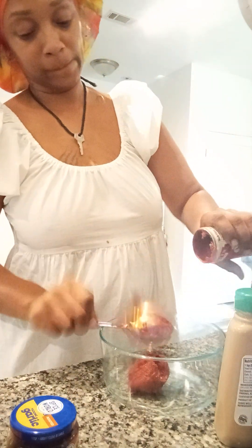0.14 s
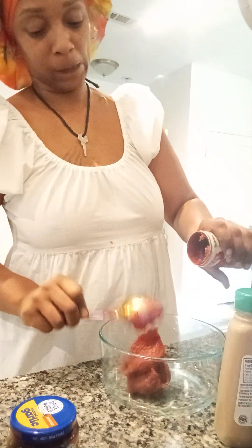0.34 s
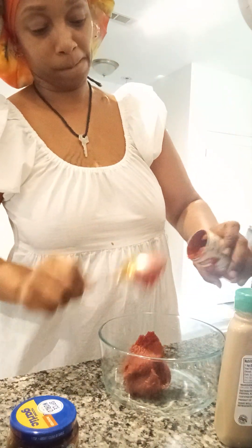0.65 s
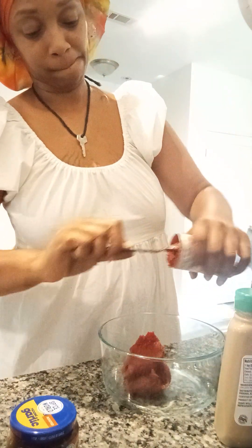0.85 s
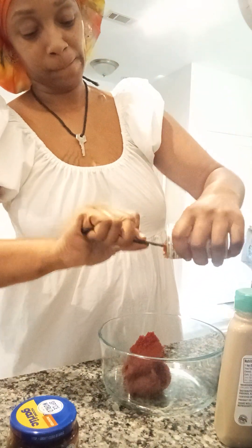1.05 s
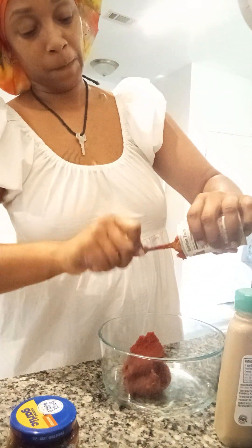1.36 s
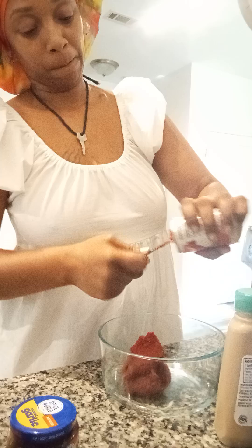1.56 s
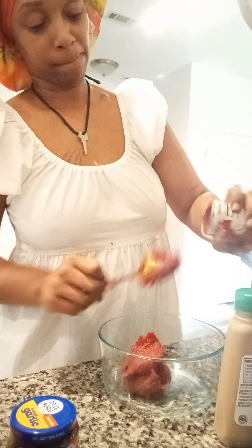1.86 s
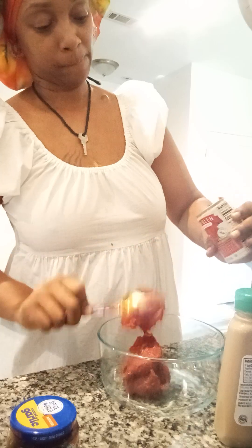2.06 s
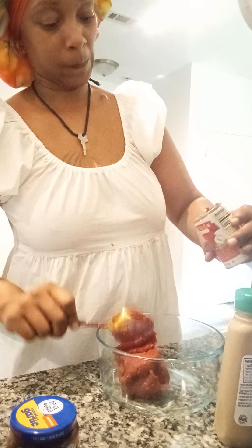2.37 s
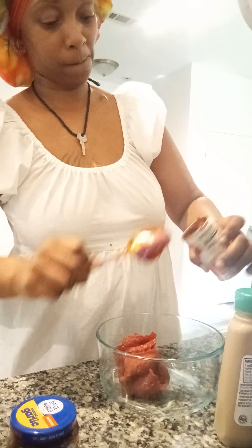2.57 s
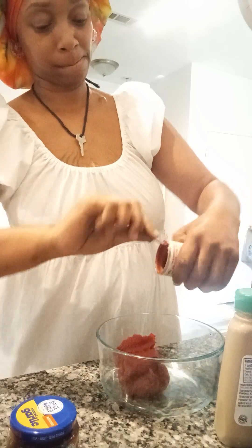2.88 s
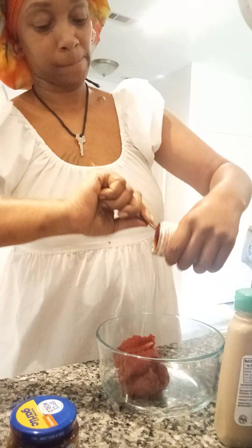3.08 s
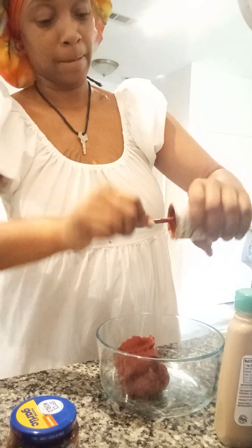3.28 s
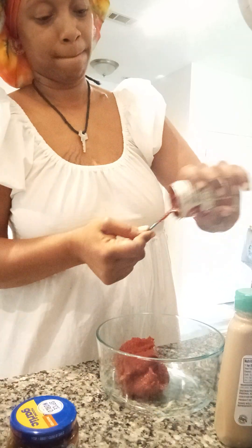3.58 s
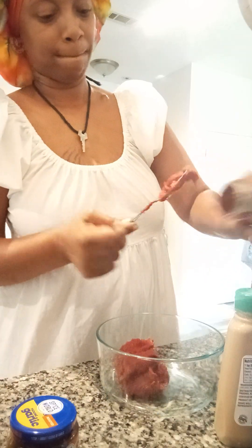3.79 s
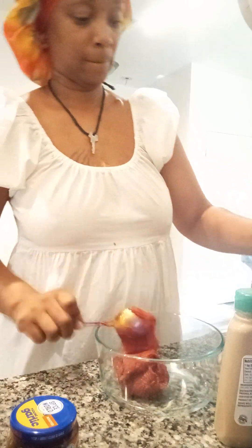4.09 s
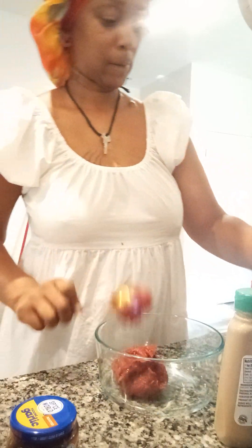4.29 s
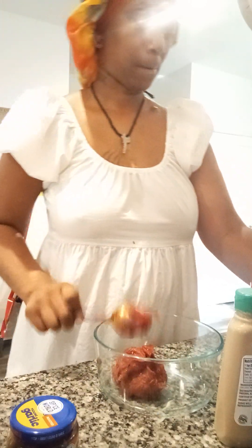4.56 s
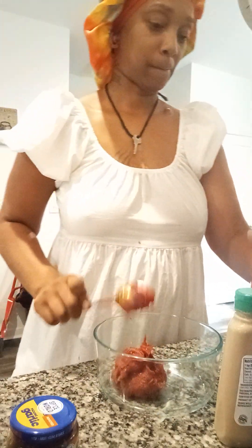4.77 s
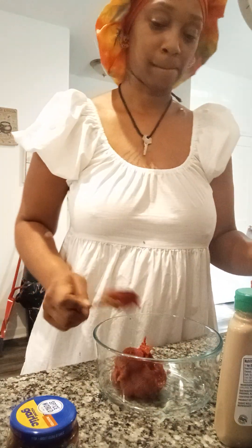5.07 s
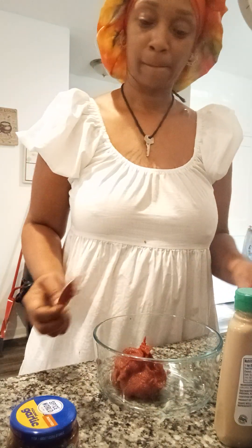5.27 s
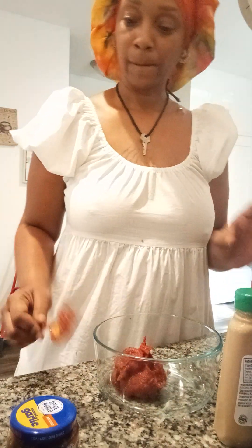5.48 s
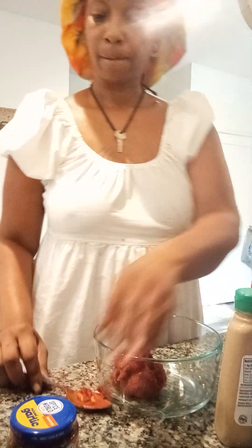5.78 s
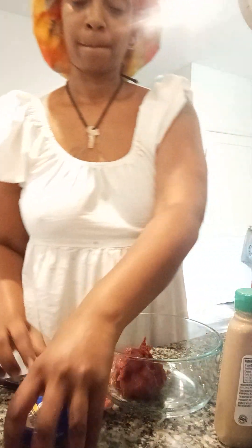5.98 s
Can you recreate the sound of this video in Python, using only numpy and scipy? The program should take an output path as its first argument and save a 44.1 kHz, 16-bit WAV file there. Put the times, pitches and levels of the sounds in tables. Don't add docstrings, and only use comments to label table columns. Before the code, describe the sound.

Sharp steel-on-glass knocks ring and rattle a bowl on a kitchen counter, separated by hollow tin scraping, ending with a metal lid clattering down.

```python
import sys
import numpy as np
from scipy import signal
from scipy.fft import rfft, irfft, next_fast_len
from scipy.io import wavfile
from scipy.ndimage import uniform_filter1d, map_coordinates

SR = 44100
rng = np.random.default_rng(int(sys.argv[2]) if len(sys.argv) > 2 else 0)


def log_audio(samples):
    frames = np.atleast_2d(samples).T
    limited = np.clip(frames, -1, 1)
    pcm = np.round(limited * 32767).astype(np.int16)
    wavfile.write(sys.argv[1], SR, pcm)


def ratio(d):
    e = np.asarray(d, float) / 20
    return 10 ** e


N = 270774
TIME = np.arange(N) / SR

# t/s, crack level/dB, counter thump/dB, brightness/dB, upper modes/dB
SPOON_KNOCKS = [(0.233, -2, -32, 0.5, -30), (0.37, -5, -33.5, 2.5, -37.5), (0.488, -2, -36, -15, -41),
                (0.614, -2, -44, -4, -42), (2.05, -4.5, -33.5, 2, -32.5), (2.189, -4.5, -35, 6, -42.5),
                (2.305, 0, -37.5, -2.5, -42.5), (2.413, -4, -37.5, 9.5, -43.5),
                (4.166, -2.5, -31.5, 5, -29.5), (4.324, -4.5, -34, 7.5, -30.5),
                (4.463, -3.5, -32.5, 2.5, -30), (4.617, -4, -36, 9.5, -32.5), (4.778, -3, -34.5, -2, -29.5),
                (4.92, -2.5, -35.5, 2, -31), (5.046, -3, -37.5, -6.5, -40)]
# t/s, level/dB, bowl-floor tone/dB, counter/dB
FOOT_LANDINGS = [(.288, -5, -11, -3.5), (.296, -4.5, -9.5, -3.5), (0.336, -11.5, -13, -1.5),
                 (.534, -6, -11.5, -5.5), (.57, -11, -12.5, -4.5), (.603, -20, -16, -3.5),
                 (.662, -4.5, -12.5, -8.5), (.694, -11, -15, -5), (.731, -13.5, -20, -4),
                 (.753, -23, -26, -3), (.778, -27.5, -23.5, -1), (2.094, -7, -11, -5.5),
                 (2.129, -9, -13.5, -8.5), (2.16, -18, -17, -4), (2.23, -7, -21, -8),
                 (2.26, -15.5, -21.5, -7), (2.285, -23.5, -20, -4), (2.357, -2, -14.5, -10.5),
                 (2.392, -11.5, -13.5, -6.5), (2.459, -25.5, -17, -6.5), (4.217, -3.5, -15.5, -9.5),
                 (4.253, -5, -20, -8.5), (4.284, -10, -13, -8), (4.311, -17.5, -13, -6),
                 (4.373, -19.5, -16, -3), (4.505, -7, -12, -6), (4.535, -11, -18, -5.5),
                 (4.563, -14.5, -23, -10), (4.591, -20.5, -17.5, -3), (4.658, -9, -17, -4.5),
                 (4.687, -16.5, -18, -0.5), (4.713, -16, -15.5, -2.5), (4.738, -21, -20, -4.5),
                 (4.825, -3.5, -13, -8.5), (4.857, -10.5, -15.5, -5.5), (4.889, -10, -18, -6),
                 (4.946, -16, -15, -5.5), (5.081, -10.5, -14, -8), (5.104, -14, -14.5, -6),
                 (5.133, -20.5, -14, -1)]
# f/Hz, width/Hz, level/dB
FLOOR_MODES = [(4010, 120, 0)]
# f/Hz, width/Hz, level/dB
SLAB_MODES = [(391, 50, -9), (465, 41, -12.5), (682, 53.6, -1.5), (755, 66, -7), (838, 70, -0.5),
              (1000, 250, -8), (1175, 90, -7), (1318, 70, -4.5), (1415, 90, -3.5)]
# f/Hz, width/Hz, level/dB
CABINET_MODES = [(93.6, 16, -1.5), (123, 22, 0.5), (169.5, 22, 1.5), (266, 86, -8.5)]


def unit(x):
    return x / np.sqrt(np.mean(x ** 2) + 1e-20)


def along(points, hz):
    f, v = np.transpose(points)
    return np.interp(np.log(hz + 1), np.log(f + 1), v)


def filtered(x, response):
    m = next_fast_len(x.shape[-1] + SR)
    return irfft(rfft(x, m) * response(np.fft.rfftfreq(m, 1 / SR)), m)[..., :x.shape[-1]]


def resonance(f, centre_hz, width_hz):
    damping = 1j * f * width_hz
    return damping / (centre_hz * centre_hz - f * f + damping)


def body(x, peaks):
    def response(f):
        return sum((-1) ** k * ratio(db) * resonance(f, hz, width_hz)
                   for k, (hz, width_hz, db) in enumerate(peaks))
    return filtered(x, response)


def coloured(spectrum):
    return unit(filtered(rng.standard_normal((2, N)), lambda hz: ratio(along(spectrum, hz))))


def partly(pair, share):
    return np.sqrt(1 - share) * pair[0] + np.sqrt(share) * pair[1] * np.array([[1], [-1]])


def decays(times, db, t60, rise=0.0016):
    out = np.zeros(N)
    for s, level_db, t in np.broadcast(times, db, t60):
        near = slice(int(s * SR), int((s + 2 * abs(t)) * SR))
        age = np.maximum(TIME[near] - s, 0)
        out[near] += ratio(level_db - 60 * age / t) * (1 - np.exp(-age / rise))
    return out


def peaked(s, db, rise_db_per_s, fall_db_per_s):
    s, db, rise, fall = [np.reshape(v, (-1, 1)) for v in (s, db, rise_db_per_s, fall_db_per_s)]
    age = TIME - s
    return ratio(db + np.where(age < 0, rise, -fall) * age)


def wobble(rate):
    return map_coordinates(rng.standard_normal(int(N / SR * rate) + 4), [TIME * rate])


def knocks():
    # f/Hz, density/dB per Hz
    crack_spectrum = [(150, -28), (250, -5), (2070, 3.5), (3980, -3), (5660, -6.5), (6400, -10.5),
                      (7370, -14), (11900, -14.5), (14900, -22.5), (16900, -43)]
    # bowl floor/dB, slab/dB
    shakes = [(1, 6), (2.5, 4), (0.5, 2.5), (3.5, 4.5), (5, 7.5), (-2, -1.5), (1.5, 7.5), (7, -3),
              (0.5, -0.5), (3.5, -2.5), (4.5, -0.5), (6, 2), (5, 6), (3, 1), (3.5, 5)]
    s, db, thump_db, bright_db, _ = np.transpose(SPOON_KNOCKS)
    floor_db, slab_db = np.transpose(shakes)
    noise = partly(coloured(crack_spectrum), share=0.34)
    treble = filtered(noise, lambda hz: hz ** 2 / (hz ** 2 + 6000 ** 2))
    push = np.zeros(N)
    push[np.round(s * SR).astype(int)] = ratio(thump_db + 58.0)
    out = noise * (decays(s, db - 7.0, 0.027) + decays(s, db - 24.5, 0.12))
    out += treble * decays(s, db + bright_db + 1.5, 0.0039)
    out += body(push, CABINET_MODES)
    out += body(noise * decays(s, db + slab_db, 0.0094), SLAB_MODES)
    out += body(noise * decays(s, db + floor_db, 0.046), FLOOR_MODES)
    return out


def rim():
    rim_hz = [2612, 3968, 5612, 7520]
    # t60/s, partner offset/Hz, left-right/dB, left phase lead/rad
    rim_modes = [(0.56, 7.8, -2.5, -0.9), (0.58, 20, 7.5, 1.25), (0.29, 6.5, 1, -1.1), (0.16, 16, 0, -1.95)]
    grips_db = [0.2, 0.57, .7, 1.2]
    partners_db = [-13.5, -9.5, -14, -12.5]
    rings = [(-44, -49, -35.5, -47), (-28, -51.5, -30.5, -46.5), (-42.5, -40.5, -29.5, -53),
             (-38, -57.5, -27.5, -47), (-49, -33.5, -40.5, -45), (-31, -64, -33.5, -54),
             (-43, -71.5, -29.5, -52.5), (-48, -66, -51.5, -22.5), (-25, -50, -26.5, -42),
             (-44, -36.5, -25.5, -30.5), (-35, -34.5, -26, -25.5), (-39, -35.5, -23, -20),
             (-31, -52.5, -26.5, -24.5), (-32, -26.5, -44, -27.5), (-30, -32, -24.5, -26)]
    uppers_hz = [4420, 5260, 6035, 11100, 11700, 13500, 6944, 7255, 8306, 8790, 9485, 9733, 10150, 10680,
                 11390, 12110, 12350, 12870, 13210, 14100, 14420, 14740, 15560]
    uppers_db = [-19, -21, -16, -30, -36, -33, -17, -18, -8, -10, -9.5, -11, -15, -8.5, -13, -12, -17, -16,
                 -14, -22, -6.5, -7.5, -13]
    flare_db, flare_share = 3, 0.18
    shimmer_rad = 0.7

    s, *_, upper_db = np.transpose(SPOON_KNOCKS)
    last = np.maximum(np.searchsorted(s, TIME) - 1, 0)
    age = np.maximum(TIME - s[last], 0)
    feet = np.array(FOOT_LANDINGS)
    landed = np.cumsum(np.bincount(np.round(feet[:, 0] * SR).astype(int), ratio(0.6 * feet[:, 1]), N))
    landed = uniform_filter1d(landed, size=400)
    held = np.maximum(landed - landed[np.round(s[last] * SR).astype(int)], 0)

    modes = []
    for hz, mode, grip, twin_db, db in zip(rim_hz, rim_modes, grips_db, partners_db, np.transpose(rings)):
        modes.append((hz, *mode, grip, twin_db, db + 4.5, 0))
    for hz, db in zip(uppers_hz, uppers_db):
        scatter_db = np.clip(rng.normal(0, 4.5, len(s)), -8, 5)
        modes.append((hz, 3500 / hz, 23, 0.3, 1.6, 1.5, -6.5, db + 4.0 + upper_db + scatter_db, shimmer_rad))

    wander = wobble(70)
    side, out = np.array([[0.5], [-0.5]]), np.zeros((2, N))
    for hz, t60, split_hz, pan_db, lead, grip, twin_db, db, shimmer in modes:
        luck = rng.standard_normal((len(s), 3))[last].T
        phase = 2 * np.pi * hz * age + shimmer * np.roll(wander, 7 * hz)
        phase = phase + side * (lead + np.tanh(luck[0]) / 2)
        flare = 1 + ratio(flare_db - 60 * age / (flare_share * t60))
        beat = np.sin(phase + 2 * np.pi * split_hz * age + 3 * luck[1])
        beat *= ratio(twin_db + 0.45 * grip * held)
        level_db = db[last] - grip * held - 60 * age / t60 + side * (pan_db + 1.9 * luck[2])
        out += ratio(level_db) * (flare * np.sin(phase) + beat)
    return out * (1 - np.exp(-age / 0.00024))


def hum():
    # start t/s, swell time/s, peak level/dB
    hum_swells = [(0.234, 0.15, -29), (.489, 0.063, -37.5), (.575, 0.046, -30.5), (.63, 0.045, -26),
                  (2.052, 0.11, -35), (2.188, 0.056, -34.5), (2.26, 0.039, -34), (2.395, 0.03, -36),
                  (4.166, 0.022, -28.5), (4.2, 0.045, -23.5), (4.31, 0.046, -24), (4.462, 0.05, -24.5),
                  (4.617, 0.078, -28), (4.765, 0.012, -31.5), (4.9, 0.0773, -26), (5.06, 0.049, -29.5),
                  (5.53, 0.0072, -75), (5.815, 0.0039, -68)]
    hum_hz, swell_db = 1527, 10
    t60_s, late_db, late_t60_s = 0.42, -11, 0.94
    s, swell_s, db = np.transpose(hum_swells)
    last = np.searchsorted(s, TIME) - 1
    swells = peaked(s + swell_s, db, swell_db / swell_s, 60 / t60_s)
    swells += peaked(s + swell_s, db + late_db, swell_db / swell_s, 60 / late_t60_s)
    size = swells[last, np.arange(N)] * (last >= 0)
    size = uniform_filter1d(size, size=300) * ratio(5.5 + 0.43 * wobble(45))
    lead = np.array([[0.5], [-0.5]]) * (-1.7 + 0.089 * wobble(9))
    return size * np.sin(2 * np.pi * hum_hz * TIME + 0.78 * wobble(30) + lead)


def rolls(s, db):
    u = np.arange(SR // 10) / SR / 0.012
    spikes = np.bincount(np.round((s - 0.0035) * SR).astype(int), ratio(db), N)
    return signal.fftconvolve(spikes, (2.72 * u) ** 1.416 * np.exp(-2.5 * u ** 1.45))[:N]


def chatter(share):
    grains = ratio(5.4 * rng.standard_normal(N))
    return partly(rng.standard_normal((2, N)) * grains, share)


def rocking():
    # f/Hz, width/Hz, level/dB
    foot_modes = [(1825, 78, -2), (2202, 68, -3.5), (2760, 340, -5.5), (3450, 300, -11), (4300, 230, -10),
                  (5470, 110, -12), (6032, 110, -2), (6990, 130, -15), (8410, 140, -9), (8250, 79, -14.5),
                  (9710, 100, -12.5), (10150, 63, -20), (10500, 81, -15.5), (11200, 75, -19.5)]
    s, db, tone_db, stone_db = np.transpose(FOOT_LANDINGS)
    slab = chatter(0.2)
    layers = [(chatter(0.44), foot_modes, db - 8.5),
              (chatter(0.4), FLOOR_MODES, db + tone_db + 0.5),
              (slab, SLAB_MODES, db + stone_db),
              (slab[[0, 0]], CABINET_MODES, db + stone_db - 18.0)]
    out = np.zeros((2, N))
    for x, peaks, level_db in layers:
        blunt = filtered(x * rolls(s, level_db), lambda hz: 1 / (1 + 1j * hz / 9000) ** 2)
        out += body(blunt, peaks) / np.std(body(x, peaks))
    return out


def between_modes(x):
    # f/Hz, width/Hz, depth/0-1
    valleys = [(4800, 340, 0.4), (6450, 280, 0.7), (7340, 120, .4), (7800, 200, .3), (9000, 500, .85),
               (10300, 350, .85), (11000, 290, .7), (11800, 400, .85), (12600, 300, .85), (13700, 700, .85),
               (15100, 500, .8)]

    def response(f):
        notches = [1 - np.clip(depth, 0, 1) * resonance(f, hz, width_hz) for hz, width_hz, depth in valleys]
        return np.prod(notches, axis=0)
    return filtered(x, response)


def ticks():
    # t/s, peak level/dB, tone f/Hz, tone level/dB
    tin_ticks = [(0.8753, -23, 2630, -22), (0.9565, -28.5, 2260, -8), (1.0842, -31, 1990, -7.5),
                 (1.1056, -38, 2050, -14), (1.8225, -29.5, 4200, -20), (2.8302, -26, 2490, -10.5),
                 (2.927, -32, 2520, -5), (2.9526, -12.5, 2313, -12), (3.376, -44, 3030, -14),
                 (3.435, -47, 5600, -7.5), (3.476, -26, 4840, -6), (3.509, -35, 2570, -9),
                 (3.662, -31, 2130, -11.5), (3.698, -34, 2900, -1.5), (3.72, -36, 6200, -12.5),
                 (3.7288, -30.5, 1910, -9.5), (3.745, -29, 3105, -2), (3.746, -42, 2630, 2),
                 (3.764, -27.5, 7200, -8), (3.7793, -33.5, 2705, -1.5), (3.8856, -51.5, 2850, -11.5),
                 (5.4141, -41.5, 2580, -14), (5.817, -42.5, 6700, -8)]
    tones_t60 = [.04, .04, .04, .04, .05, .04, .04, .035, .03, .04, .03, .12, .04, .06, .03, .04, .05, .12,
                 .03, .06, .03, .03, .03]
    # f/Hz, density/dB per Hz
    tick_spectrum = [(240, -57), (400, -33.5), (1150, -5), (1810, -9.5), (2320, -5), (4000, -10),
                     (5220, -4.5), (12300, -24), (16500, -33)]
    s, db, _, _ = np.transpose(tin_ticks)
    out = partly(coloured(tick_spectrum), share=0.41) * decays(s, db - 7.5, 0.03, rise=0.00038)
    for (start_s, peak_db, hz, tone_db), t60 in zip(tin_ticks, tones_t60):
        lead = np.array([[0], [rng.normal(0, 1.8)]])
        tone = np.sin(2 * np.pi * hz * (TIME - start_s) + lead)
        out += decays(start_s, peak_db + tone_db, t60) * tone
    return out


def scraping():
    # hardest moment t/s, level/dB, 20 dB swell/s, 20 dB fade/s
    strokes = [(.895, -44, 0.18, 0.06), (1.5, -66, 0.7, 6), (1.257, -55, 0.3, 0.17),
               (1.786, -40, 0.0244, -0.03), (1.811, -37, 0.03, -0.0261), (2.89, -52, 0.22, 0.37),
               (3.0, -73, -0.1, -1), (3.505, -49, 0.11, 0.12), (3.704, -42, 0.12, -0.0349),
               (3.761, -33.5, 0.0265, 0.0167), (3.784, -39, -0.03, 0.0248)]
    strokes_low_db = [-3, -6, -2, -0.5, -1.5, -2.5, -5.5, -3.5, 4, -6.5, -14]
    # f/Hz, width/Hz, level/dB
    wall_modes = [(328, 110, -2.5), (1212, 210, 3.5), (2170, 47, 3), (2690, 400, -2), (3240, 200, 1),
                  (3810, 620, -3), (5200, 580, 1), (5900, 1400, -2.5), (7540, 1300, -4.5),
                  (10200, 6900, -17.5)]
    grains_db = 3.4 * unit(uniform_filter1d(rng.standard_normal(N), size=50))
    grit = partly(rng.standard_normal((2, N)) * ratio(grains_db), share=0.53)
    s, db, swell_s, fade_s = np.transpose(strokes)
    low, high = body(grit, wall_modes[:2]), body(grit, wall_modes[2:])
    out = np.zeros((2, N))
    for level_db, wall in ((db + strokes_low_db, low), (db, high)):
        size = peaked(s, level_db, 20 / np.abs(swell_s), 20 / np.abs(fade_s)).sum(axis=0)
        out += size * wall / np.std(low + high)
    return out


def pop():
    start_s, level_db, t60_s = 2.9275, -31.5, 0.061
    from_hz, to_hz, fall_s, rough_rad = 1720, 922, 0.0018, 1.1
    age = np.maximum(TIME - start_s, 0)
    turns = to_hz * age + (from_hz - to_hz) * fall_s * (1 - np.exp(-age / fall_s))
    tone = np.sin(2 * np.pi * turns + rough_rad * wobble(1300))
    return decays(start_s, level_db, t60_s, rise=0.00025) * tone


def brush():
    # f/Hz, level/dB, t60/s
    brush_tones = [(1560, -48.5, 0.045), (2580, -63, 0.26), (3160, -42, 0.015), (3900, -43.5, 0.018),
                   (4800, -46, .016)]
    return sum(decays(5.818, db, t60) * np.sin(2 * np.pi * hz * TIME) for hz, db, t60 in brush_tones)


def booms():
    # t/s, peak level/dB, pitch f/Hz
    hollow = [(0.882, -48, 955), (1.185, -57, 776), (1.244, -41.5, 748), (1.261, -46, 717),
              (1.294, -46.5, 727), (1.368, -56.5, 740), (1.455, -58.5, 817), (1.499, -59, 783),
              (1.658, -60, 893), (1.764, -37.5, 765), (1.777, -34, 765), (1.786, -33.5, 770),
              (1.796, -39.5, 768), (1.872, -54, 720), (2.953, -42, 937), (2.99, -50, 910), (3.03, -51, 907),
              (3.07, -54, 917), (3.11, -55, 913), (3.16, -60.5, 920), (3.629, -48, 783), (3.661, -33, 792),
              (3.681, -32, 702), (3.698, -31, 709), (3.705, -31, 730), (3.72, -35, 731), (3.734, -33, 736),
              (3.741, -32, 719.5), (3.803, -49, 700), (3.83, -53.5, 730), (3.895, -52.5, 719)]
    jerks = wobble(170)
    out = np.zeros((2, N))
    for s, db, hz in hollow:
        tone = np.sin(2 * np.pi * hz * (TIME - s) + 0.5 * jerks + np.array([[-0.3], [0.3]]))
        out += decays(s, db + 1.5, 0.088, rise=0.0045) * ratio(1.2 * wobble(60)) * tone
    return out


def lid():
    # t/s, peak level/dB, knock/dB, crack/dB
    lid_drops = [
        (5.9582, 0, -25.5, -11),
        (5.9765, -3.5, -44.5, -9),
        (5.991, -12, -29.5, -7),
        (6.0012, -19, -29, -8.5),
        (6.008, -24, -28.5, -8.5),
    ]
    lid_hz = [1793, 2700, 4150, 5136, 6368, 7300, 7704, 8300, 9464, 10600, 12000, 13940, 15300]
    # width/Hz, level/dB
    lid_modes = [(54, -17.5), (120, -13.5), (218.5, -8.5), (44.6, -1.5), (129.5, -8), (76.9, 4), (90, -8.5),
                 (170, 1.5), (28, 5), (40, 2), (300.4, -17), (69.5, -5.5), (80, -3.5)]
    # f/Hz, density/dB per Hz
    crack_spectrum = [(800, -25.0), (3000, -16), (8000, 7.0), (15000, -9.5)]
    knock_spectrum = [(40, -35.5), (100, -3), (300, 1.0), (550, -8.5), (1000, -11.5), (2500, -14.5)]
    s, db, knock_db, crack_db = np.transpose(lid_drops)
    shake = partly(rng.standard_normal((2, N)), share=0.32) * decays(s, db + 8.5, 0.019)
    out = partly(coloured(crack_spectrum), share=0.39) * decays(s, db + crack_db - 10, 0.023)
    out += partly(coloured(knock_spectrum), share=0.15) * decays(s, db + knock_db - 5.5, 0.081)
    out += body(shake, [(hz, *mode) for hz, mode in zip(lid_hz, lid_modes)])
    return out * ratio([[1.7], [-1.7]])


def diffuse(pair):
    # f/Hz, left-right correlation
    likeness = [(60, 0.96), (160, 1), (300, 0.92), (600, 0.77), (1400, -0.75), (3000, 0.57)]

    def response(hz):
        turn = np.arccos(np.clip(along(likeness, hz), -1, 1)) / 2
        return np.array([np.cos(turn), np.sin(turn)])
    mid, side = filtered(pair, response)
    return np.array([mid + side, mid - side])


def kitchen(x):
    # f/Hz, t60/s
    room_t60 = [(100, 0.94), (260, 0.46), (700, 0.5), (1800, 0.59), (5000, 0.7), (13000, 0.54)]
    # f/Hz, level/dB
    room_db = [(100, -9), (500, 1), (2000, -8.5), (3200, -7.5), (4050, -13.5), (4700, -8), (6000, -11.5),
               (7500, -9.5), (14000, -20)]
    hz, t, z = signal.stft(rng.standard_normal((2, SR)), SR, nperseg=256)
    fade = ratio(-60 * t / along(room_t60, hz)[:, None])
    tail = signal.istft(z * fade, SR, nperseg=256)[1]
    tail = diffuse(tail / np.linalg.norm(tail[0]))
    tail = filtered(tail, lambda f: ratio(along(room_db, f)))
    delayed = np.pad(x, ((0, 0), (220, 0)))
    return signal.fftconvolve(delayed, tail, axes=1)[:, :N]


def air():
    # t/s, gain/dB
    phone_gain = [(0, -1), (.118, -1), (.2, -1.5), (1.0, 4), (1.476, 4.5), (2.02, 6), (2.75, -1),
                  (3.826, 4), (3.95, 6), (4.14, -2), (5.5, 6), (5.658, 3.5), (5.93, 6.5)]
    # f/Hz, density/dB per Hz
    rumble_spectrum = [(13, -75), (22, -49.5), (75, -16), (123, -4.5), (285, -11), (539, -31), (601, -52.5),
                       (724, -31.5), (900, -51), (1170, -91.5), (1980, -120)]
    # f/Hz, density/dB per Hz
    hiss_spectrum = [(590, -50.5), (1000, -20.5), (1440, -21), (1490, -7.5), (2330, -14.5), (6090, 1.5),
                     (9850, -9.5), (12000, -12.5), (16500, -22)]
    rumble_db, hiss_db = -67.5, -71
    gain_db = np.interp(TIME, *np.transpose(phone_gain))
    rumble = ratio(rumble_db) * diffuse(coloured(rumble_spectrum))
    return ratio(gain_db) * (rumble + ratio(hiss_db) * coloured(hiss_spectrum))


def to_microphones(x):
    # f/Hz, level/dB, extra lag/rad
    shade = [(180, -0.5, 0), (385, -3, 0.94), (700, -2.5, 0.068), (2000, -1.5, 0.23), (8800, 4, 0),
             (13000, 0.5, 0.97)]
    # f/Hz, level/dB
    echo_colour = [(4000, 0.5), (4450, 1), (4800, -6), (5150, 0.5), (6100, 3.5), (6650, 3), (7000, 2),
                   (7400, 3.5)]
    hz, db, lag_rad = np.transpose(shade)

    def response(f):
        lag = 2 * np.pi * f * 0.00022 + np.interp(f, hz, lag_rad)
        left = ratio(np.interp(f, hz, db)) * np.exp(-1j * lag)
        return ratio(along(echo_colour, f)) * np.array([left, np.ones_like(f)])
    return filtered(x, response)


def scene():
    blows = to_microphones(knocks())
    glass = rim()
    rock = between_modes(to_microphones(rocking()))
    can = ticks() + scraping() + pop() + brush() + booms()
    cap = lid()
    sent = between_modes(blows) + rock + ratio(-4.5) * cap + ratio(-4) * glass + ratio(-4.5) * can
    return blows + glass + hum() + rock + ratio(1.0) * can + cap + kitchen(sent) + air()


def low_pass(x):
    return signal.sosfilt(signal.butter(12, 17020, fs=SR, output="sos"), x)


def record(dry):
    mic = filtered(dry, lambda hz: 1 / (1 + (hz / 16100) ** 30))
    mix = mic / (1 + np.abs(mic / 1.4) ** 6) ** (1 / 6)
    return low_pass(mix)


dry = scene()
out = record(dry)
log_audio(out)
```